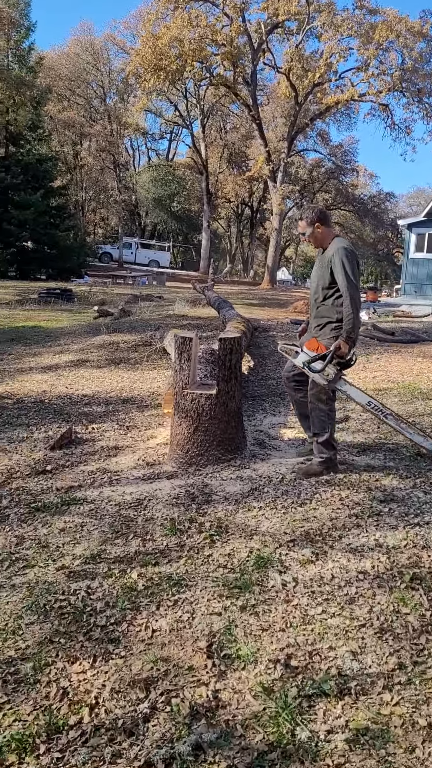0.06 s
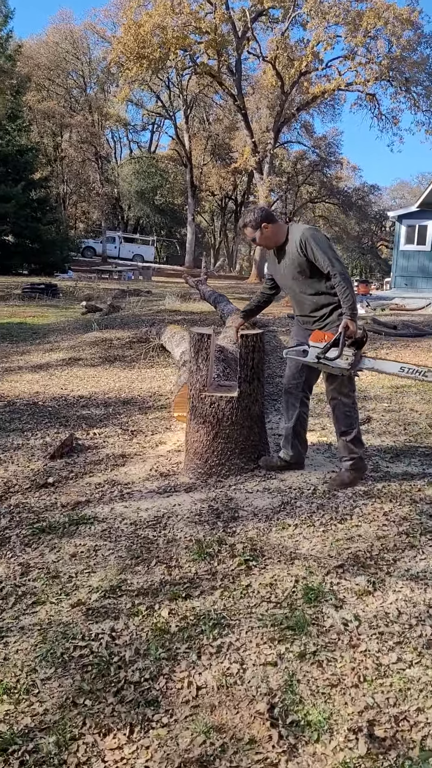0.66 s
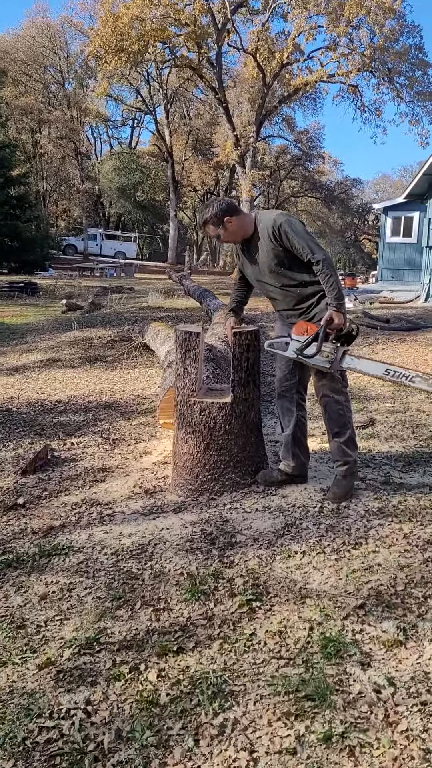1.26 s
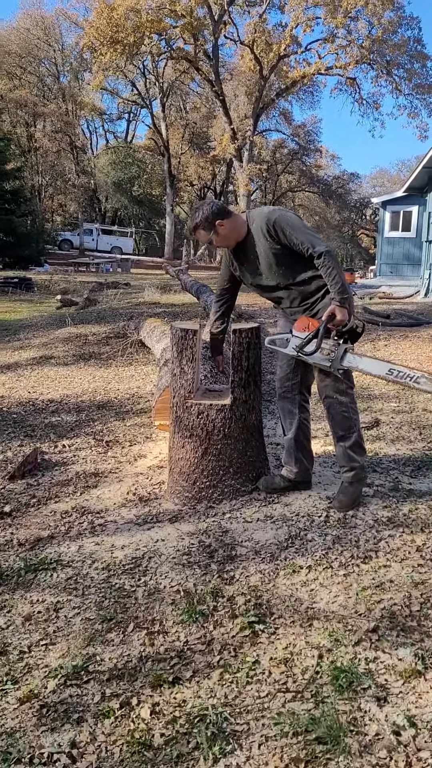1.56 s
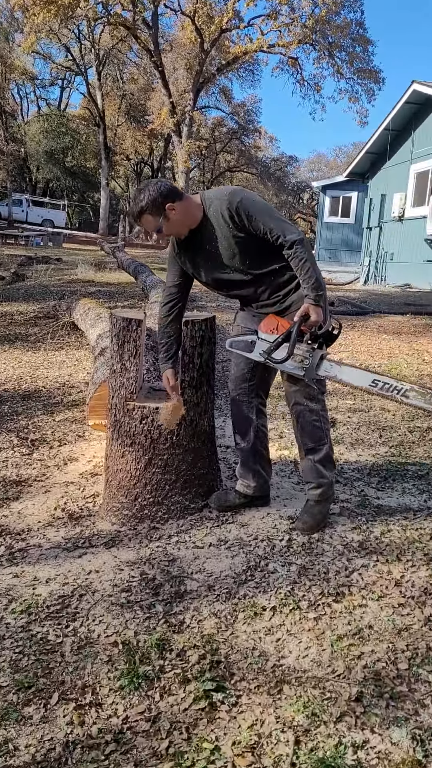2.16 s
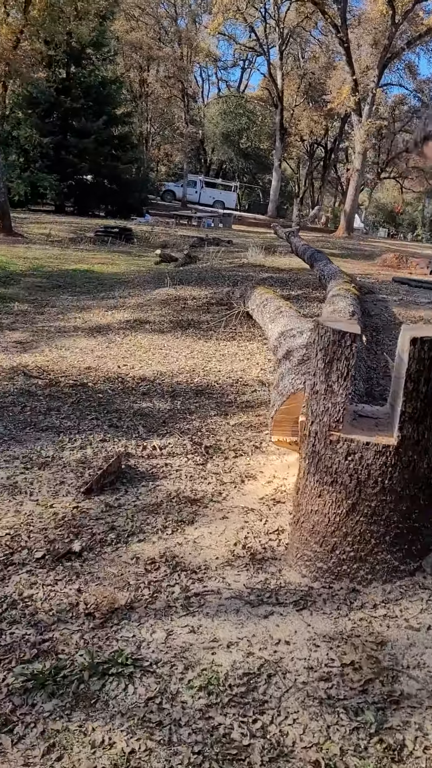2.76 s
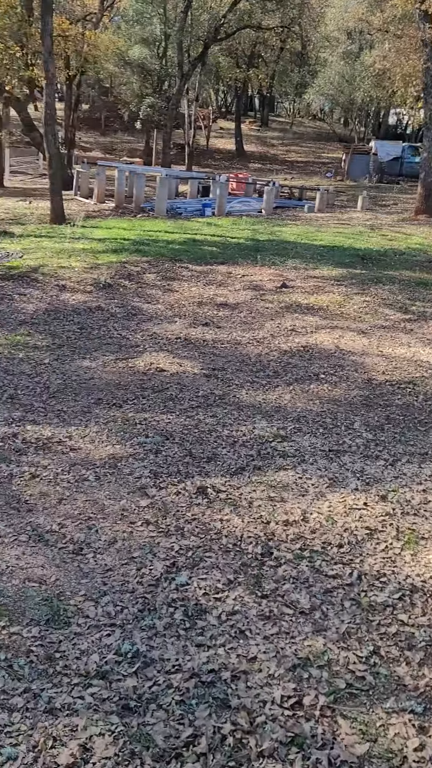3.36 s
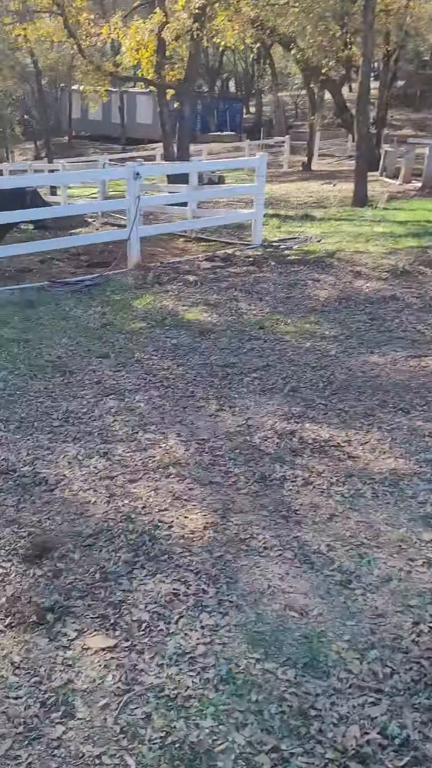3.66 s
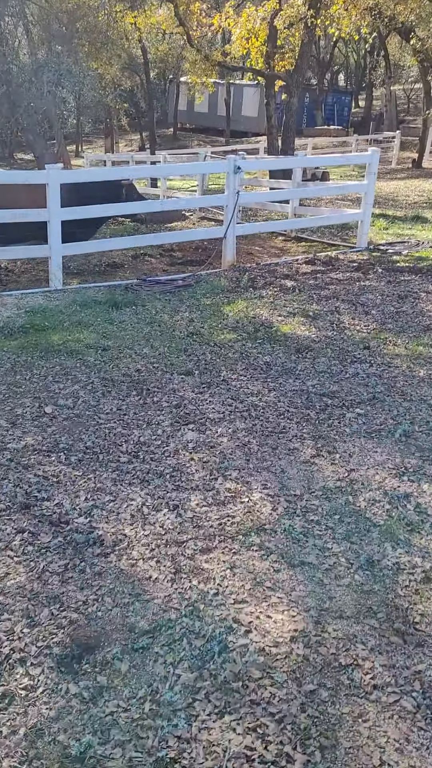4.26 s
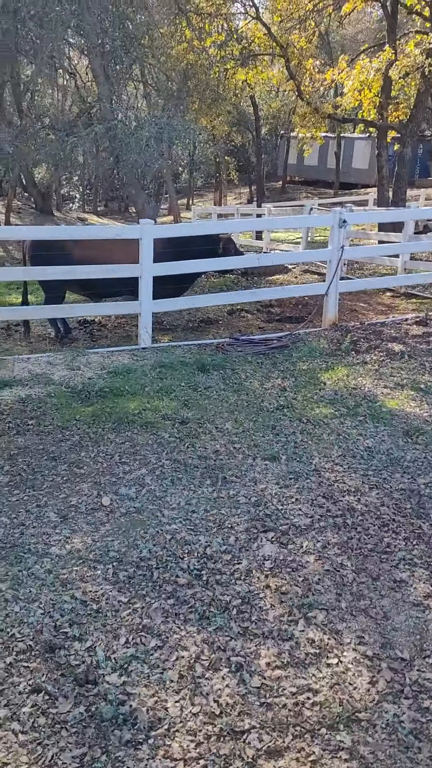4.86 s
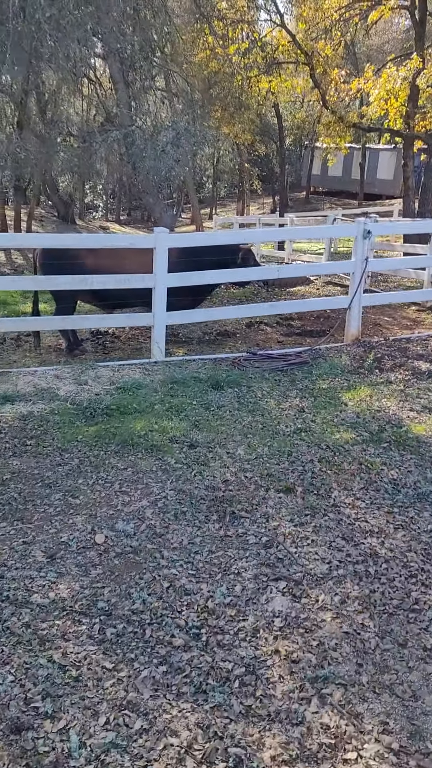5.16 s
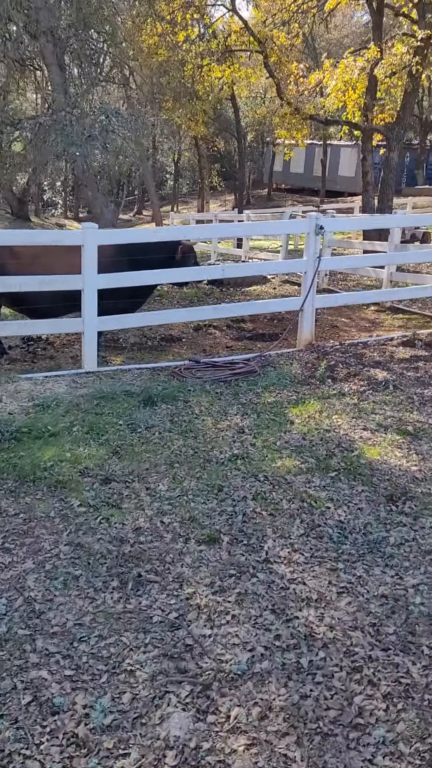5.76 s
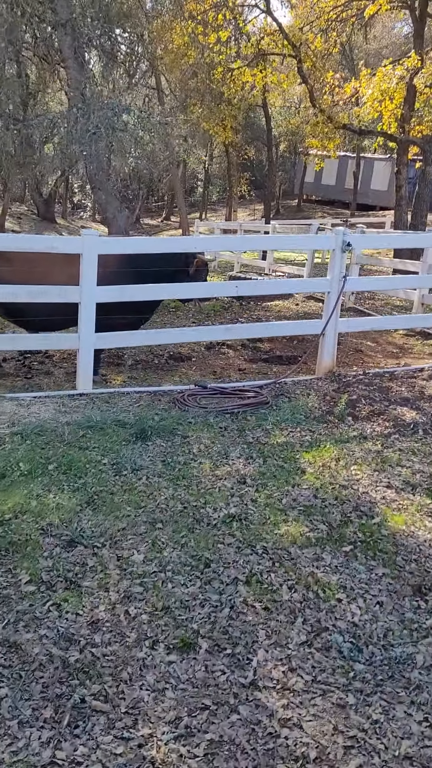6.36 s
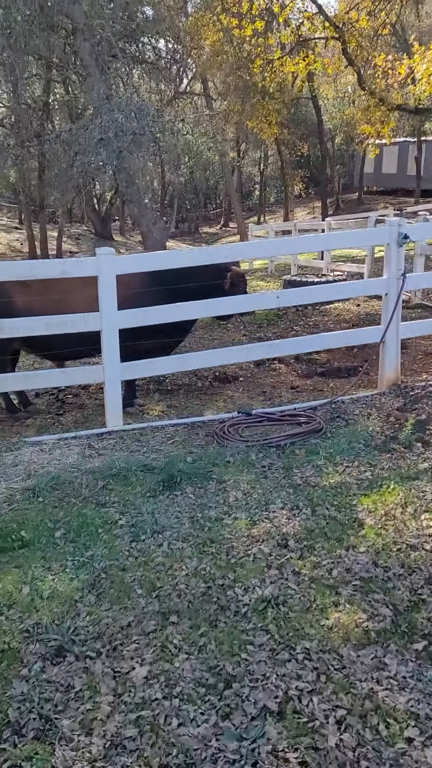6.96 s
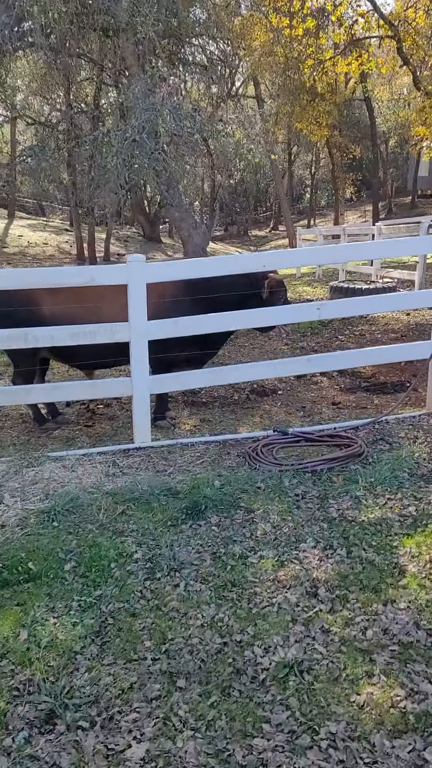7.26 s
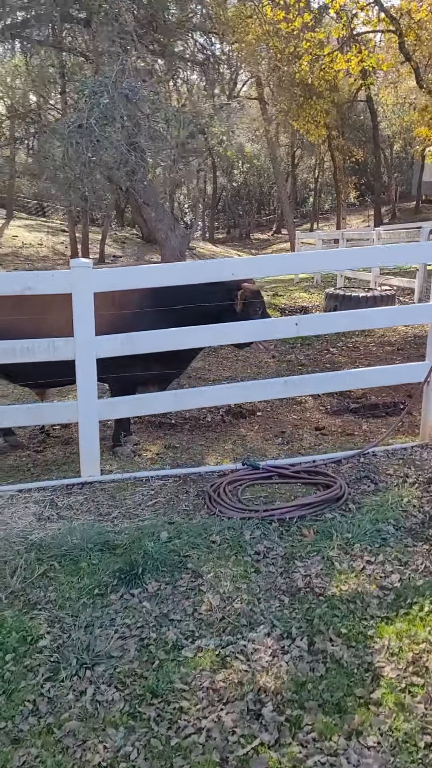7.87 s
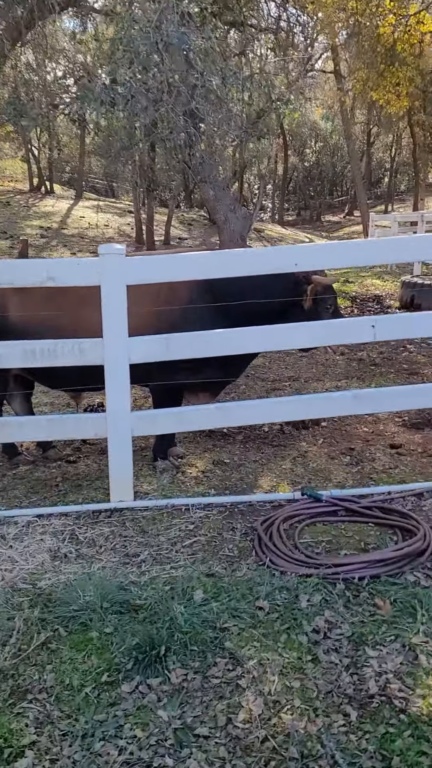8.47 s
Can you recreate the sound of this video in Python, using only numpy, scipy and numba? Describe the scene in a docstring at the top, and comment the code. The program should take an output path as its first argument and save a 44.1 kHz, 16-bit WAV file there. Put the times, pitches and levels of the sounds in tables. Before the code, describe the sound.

A bull bellows twice, each low hum breaking into a rasping roar, while footsteps crunch through dry leaves outdoors.

```python
"""A bull bellows three times behind a paddock fence while someone with a phone walks up through dry leaves.
The first bellow is just ending. The other two start as a rush of air and a low hum, then break into a
rasping roar as the mouth opens; the last dips in pitch midway. His vocal folds chop the air into pulses
that ring in his chest, throat, mouth and nose. Leaves crunch, twigs snap, heels knock, and a breeze
buffets the phone's two microphone ports (left and right) over the hush of far trees."""
import sys
import numpy as np
from scipy import signal
from scipy.fft import rfft, irfft
from scipy.io import wavfile
from scipy.ndimage import uniform_filter1d, map_coordinates
from numba import njit

SR = 44100
rng = np.random.default_rng(int(sys.argv[2]) if len(sys.argv) > 2 else 0)


def bounce(signal):
    """Save signal as a 16-bit WAV file at the path given by the first command-line argument."""
    frames = np.transpose(np.atleast_2d(signal))
    limited = np.clip(frames, -1, 1)
    pcm = np.round(limited * 32767).astype(np.int16)
    wavfile.write(sys.argv[1], SR, pcm)


N = 384993
TIME = np.arange(N) / SR


# How fast the vocal folds beat: t/s, f/Hz
VOICE_PITCH = [(0, 94.58), (.15, 87.47), (1.62, 76), (1.75, 79.11), (1.87, 91.47), (2.35, 102.3),
               (2.76, 103.6), (3.2, 110), (3.7, 114.5), (4.0, 111.5), (4.48, 110), (4.72, 125.5),
               (4.98, 131.5), (5.3, 108.7), (6.48, 76.27), (6.56, 88), (6.63, 95.44), (6.92, 100),
               (7.13, 105.8), (7.41, 106.9), (7.46, 98.15), (7.53, 103.2), (7.58, 85.7), (7.71, 104.2),
               (7.75, 119), (7.93, 129.5), (8.08, 129.5), (8.3, 124.9), (8.43, 125.5), (8.73, 117)]
# How far the mouth is open: t/s, opening/0-1
MOUTH_OPENING = [(0, 0.04), (.2, 0), (1.7, 0), (2.05, 0.26), (2.85, 0.01), (3.75, 0.26), (4.5, 0.34),
                 (4.98, 0.88), (5.22, 0.58), (5.35, 0), (6.5, 0.3), (7.0, 0.78), (7.65, 0.72), (7.9, 1),
                 (8.3, 1), (8.73, 0.89)]
def bull(mouth_shut_db=-47, mouth_opens_db=24.5, rasp_opens_db=19.5, waver_db=1.14):
    """The folds drive a deep hum, plus a mouth tone and a rasp that grow as the mouth opens."""
    (pitch_hz,), (opening,) = curves(VOICE_PITCH), curves(MOUTH_OPENING)
    voiced, blowing, rush, rough, rasp_db, nasal_db = effort()
    facing = np.interp(TIME, [2.6, 4.7], [.42, 1.0])  # the phone swings round to him
    pulses, alternation, rattle = larynx(pitch_hz, rough)
    mouth_tone = mouth(pulses, rattle, rough, opening, facing)
    rasp_tone = rasp(pulses, rattle, rough, opening, nasal_db, facing)
    hum_tone = hum(pulses, alternation, rattle, rough, pitch_hz, facing)
    hum_gain = voiced * hum_strength() * undb(waver_db * wander(16))
    mouth_gain = blowing * undb(mouth_shut_db + mouth_opens_db * opening) + (0.16 + 2.1 * opening) * rush
    rasp_gain = blowing * undb(rasp_db + rasp_opens_db * opening) + rush
    upper_voice = mouth_gain * mouth_tone + rasp_gain * rasp_tone
    return hum_gain * hum_tone + upper_voice * undb(waver_db * wander(11))


# One row a bellow: start/s, break into a roar/s, end/s, roughness of the hum/0-1, opening rush of air/dB,
# shut-mouth rasp in the hum/dB, shut-mouth rasp in the roar/dB, boost of the nose's ring in the hum/dB
BELLOW_PLAN = [(-.3, 0.19, .13, 0.37, -65, -47.5, -44, 0.5),
               (1.636, 2.822, 5.26, 0.19, -47.5, -49, -44.5, 2),
               (6.52, 7.73, 8.8, 0.31, -49, -50, -46.5, 6.5)]
def effort(attack_s=.052, release_s=0.024, roar_rough=0.551, break_s=.06, catch_rough=0.46, catch_s=.15):
    """Air rushes, the folds sputter and catch, the hum breaks into a roar, and the air runs out."""
    rows = np.array(BELLOW_PLAN)
    current = np.searchsorted((rows[:-1, 2] + rows[1:, 0]) / 2, TIME)  # the nearest bellow
    start, breaks, end, hum_rough, rush_db, hum_rasp_db, roar_rasp_db, nasal_db = rows[current].T
    voiced = envelope(start, attack_s, end, release_s)
    # air flows after the folds stop, and rushes before they catch
    blowing = envelope(start, attack_s, end + 0.057, release_s=0.048)
    rush = undb(rush_db) * envelope(start - 0.0635, 0.0089, start - .01, release_s)
    roaring = (1 + np.tanh((TIME - breaks) / break_s)) / 2
    rasp_db = hum_rasp_db + (roar_rasp_db - hum_rasp_db) * roaring
    sputter = (catch_rough - hum_rough) * swell(start, catch_s)
    rough = hum_rough + (roar_rough - hum_rough) * roaring + sputter + .4 * (1 - voiced)
    return voiced, blowing, rush, np.clip(rough, 0, 1), rasp_db, nasal_db * (1 - roaring)


def larynx(pitch_hz, rough, jitter=0.0098, flap_scatter=.16, puff_sharpness=0.29, slap_share=0.45):
    """The voice box: its folds pulse, strong and weak in turn; loose tissue rattles at half their rate."""
    unsteady_hz = pitch_hz * (1 + jitter * (0.25 + 2 * rough) * wander(45))
    phase = 2 * np.pi * np.cumsum(unsteady_hz) / SR
    cycle = phase // (2 * np.pi)
    beats = np.diff(cycle, prepend=0)  # one click a cycle
    unevenness = (-1) ** cycle * (.7 + .5 * wander(9)) + .5 * wander(110)
    pulses = unit(beats * (1 + rough ** 2 * unevenness))
    alternation = unit(beats * (-1) ** cycle)
    flap = 2 * np.pi * np.cumsum(pitch_hz / 2 * np.exp(flap_scatter * wander(130))) / SR
    slaps = unit(np.diff(flap // (2 * np.pi), prepend=0) * undb(2.7 * wander(90)))
    puffs = unit(rng.standard_normal(N) * np.exp(puff_sharpness * np.cos(flap) + 0.57 * np.cos(phase)))
    return pulses, alternation, unit(puffs + slap_share * slaps)


def hum(pulses, alternation, rattle, rough, pitch_hz, facing, rest_hz=314, follow=0.56, doubling_hz=115):
    """Throat and chest ring low; the deepest tones grow and stay clear in the roar."""
    # pushed to a high pitch, the folds' strong-weak beat adds a tone an octave down
    doubling = 0.37 * np.clip((pitch_hz - doubling_hz) / 12, 0, 1)
    deep_rattle = 0.77 * rough * rattle
    chest_flow = (0.68 + 0.4 * rough) * pulses + 1.45 * deep_rattle
    hum_flow = (1 - rough) * pulses + doubling * rough * alternation + (0.8 + 0.9 * rough) * deep_rattle
    clean = np.clip((.48 - rough) / .2, 0, 1)
    ring_hz = rest_hz + follow * clean * (3 * pitch_hz - rest_hz)  # leans towards three times the pitch
    throat = cavity(hum_flow, facing, ring_hz, width_hz=49, db=4, pan_db=-12, lead_ms=0.44)
    chest = cavity(chest_flow * (0.44 + rough), facing, 140, width_hz=98, db=-17.5, pan_db=-8, lead_ms=0)
    neck = cavity(chest_flow, facing, 235, width_hz=50, db=-4, pan_db=-6, lead_ms=0.2)
    return even(throat + chest - neck, .06)


# How loud the hum is: t/s, level/dB
HUM_LOUDNESS = [(.1, -29), (1.65, -30.5), (1.71, -27.5), (1.8, -28.5), (2.199, -21), (2.72, -22),
                (2.951, -26.5), (3.5, -26), (3.7, -22.5), (4.95, -22.5), (5.25, -22.5), (6.52, -25),
                (6.56, -21), (6.902, -18), (7.0, -14.5), (7.22, -13), (7.38, -11.5), (7.57, -17.5),
                (7.68, -14.5), (7.77, -20), (8.25, -18), (8.73, -22)]
# Brief dips in the hum: t/s, half length/s, dip/dB
HUM_STUMBLES = [(1.80, .02, -3.5), (6.769, .008, -4), (6.904, .01, -7), (6.942, .02, -4),
                (7.186, 0.0091, -11), (7.309, .014, -7.5), (7.437, .015, -3.5)]
def hum_strength(throb_hz=36, throb_depth=0.45):
    """The hum swells, stumbles for a few cycles at a time, and throbs as the last bellow gathers."""
    hum_db, = curves(HUM_LOUDNESS)
    stumble_db = sum(db * swell(s, half_s) for s, half_s, db in HUM_STUMBLES)
    throb = 1 + throb_depth * swell(6.73, half_s=.1) * np.sin(2 * np.pi * throb_hz * TIME)
    return throb * undb(hum_db + stumble_db)


# Where the mouth rings as jaw and neck stretch: t/s, f/Hz
MOUTH_RING = [(.1, 633), (1.6, 590), (3.2, 597), (4.5, 666), (5.0, 638), (6.5, 723), (7.25, 690.5),
              (7.9, 635), (8.7, 614)]
def mouth(pulses, rattle, rough, opening, facing):
    """The mouth rings, the back of the throat fades as it opens, and a rough roar spills between them."""
    ring_hz, = curves(MOUTH_RING)
    flow = (.85 - .3 * rough) * pulses + (.2 + 1.3 * rough) * rattle
    spill_flow = np.clip(rough - .4, 0, 1) * flow
    back_flow = np.clip(1 - opening, .15, 1) * flow
    front = cavity(flow, facing, ring_hz, width_hz=145, db=0, pan_db=12, lead_ms=0.35)
    spill = cavity(spill_flow, facing, 530, width_hz=240, db=4.2, pan_db=-10.5, lead_ms=0.22)
    back = cavity(back_flow, facing, 414, width_hz=117, db=-4.5, pan_db=-8.5, lead_ms=0.22)
    return even(front + spill - back, 0.083)


# Six high rings (resonances) of throat and nose, low to high:
# width/Hz, relative level/dB, change with the mouth wide open/dB, left minus right/dB, left lead/ms
RASP_RINGS = [(229, 6.5, 3.5, 3, 0.18), (215, 6, 4, -2, 0.27), (117, 5, -4.5, -3, 0.028),
              (130, -4, -3, -8.5, .12), (240, -7, -.5, -4, 0.2), (300, -14.5, -1.5, 2.5, .25)]
# Where those rings lie as neck and tongue move: t/s, then six times f/Hz
RASP_PATHS = [(0.101, 865, 1170, 1377, 1810, 2520, 3020), (1.65, 970, 1144, 1257, 1880, 2200, 2980),
              (2.1, 1045, 1300, 1525, 1920, 2180, 3190), (2.7, 950, 1150, 1384, 1760, 2130, 3180),
              (3.4, 877, 1084, 1427, 1780, 2220, 3500), (4.1, 910, 1164, 1438, 1880, 2140, 3680),
              (5.0, 946, 1200, 1420, 1890, 2400, 3453), (6.6, 950, 1255, 1390, 1915, 2660, 3980),
              (7.3, 965, 1263, 1379, 1823, 2510, 3850), (8.0, 925, 1236, 1490, 1957, 2620, 3540),
              (8.6, 890, 1213, 1397, 1830, 2350, 3460)]
def rasp(pulses, rattle, rough, opening, nasal_db, facing, flicker_db=1.22, drift=.009, hiss_db=-21):
    """Throat and nose ring high, each ring flickering and drifting, with a hiss of breath on top."""
    nose_ring, first_airy_ring = 3, 3  # counted from 0
    voiced_flow = (.9 - .7 * rough) * pulses + (.6 + rough) * rattle
    airy_flow = .4 * pulses + 1.1 * rattle
    rings = 0
    for k, (hz, (width_hz, db, opens_db, *place)) in enumerate(zip(curves(RASP_PATHS), RASP_RINGS)):
        db = db + opens_db * opening + nasal_db * (k == nose_ring) + flicker_db * wander(8)
        flow = voiced_flow if k < first_airy_ring else airy_flow
        rings = rings + cavity(flow, facing, hz * (1 + drift * wander(10)), width_hz, db, *place)
    bright_noise = colour(rng.standard_normal((2, N)), LEAF_COLOUR)
    hiss = unit(cut(bright_noise, 3600, "high")) * undb([[-5], [0]])
    return even(rings, 0.23) + undb(hiss_db) * hiss


def cavity(flow, facing, hz, width_hz, db, pan_db, lead_ms):
    """One air space in the bull rings; facing scales how unequally it reaches the two ports."""
    return ports(undb(db) * steep_ring(flow, hz, width_hz), pan_db * facing, lead_ms)


# Wheezes as a bellow starts or ends: t/s, half length/s, level/dB, f/Hz, width/Hz
THROAT_WHEEZES = [(.13, .05, -60, 3080, 450), (.2, 0.032, -43.5, 1350, 150), (0.205, 0.032, -59, 2600, 500),
                  (1.583, .011, -42, 990, 190), (1.625, 0.018, -43, 980, 190),
                  (1.613, 0.028, -44, 1230, 300), (1.645, 0.046, -53.5, 2930, 620),
                  (6.487, 0.023, -42, 760, 220), (6.522, .05, -57, 4100, 600)]
def wheezes():
    """Air whistles through the narrowed throat."""
    air = rng.standard_normal(N)
    whistle = sum(undb(db) * swell(s, half_s) * unit(steep_ring(air, hz, width_hz))
                  for s, half_s, db, hz, width_hz in THROAT_WHEEZES)
    return ports(whistle, pan_db=-1, lead_ms=0.1)


def echoes(voice, far_s=0.8, far_db=-20, near_s=0.16, near_db=-6):
    """Ground and fence rails scatter the upper voice at once; trunks and sheds add a thin, dull echo."""
    t = TIME[:SR]
    near = cut(rng.standard_normal((2, SR)), 658, "high", order=4) * undb(-60 * t / near_s)
    far = cut(rng.standard_normal((2, SR)), 2500, "low") * undb(-60 * t / far_s)
    # scaled so that a longer echo is no louder
    tail = near * undb(near_db) / np.sqrt(near_s) + far * undb(far_db) / np.sqrt(far_s)
    return signal.fftconvolve(voice, tail * np.sqrt(2 * np.log(1000) / SR), axes=1)[:, :N]


# Steps in dry leaves: t/s, crunch level/dB, coming down/s, pressing/s, scuff above the crunch/dB
FOOTFALLS = [(0.311, -52, 0.029, 0.082, 1.5), (.48, -55.5, 0.013, 0.017, 2), (.65, -68.5, 0.014, 0.033, 6),
             (0.784, -53.5, 0.037, 0.016, 3.5), (.88, -53.5, 0.021, 0.016, 0.5),
             (1.03, -54.5, 0.055, 0.029, 0.5), (1.331, -65, 0.0065, 0.058, 3),
             (1.59, -59.5, 0.074, 0.16, 5), (2.246, -43.5, 0.045, 0.029, -2),
             (2.528, -51.5, 0.016, 0.12, -9.5), (2.848, -48.5, 0.026, 0.15, -8.5),
             (3.129, -54.5, 0.033, 0.014, 6.5), (3.42, -54.5, 0.027, 0.17, -5),
             (4.108, -43.5, 0.073, 0.049, -10), (4.61, -49.5, 0.019, 0.13, -3),
             (5.144, -41, 0.014, 0.13, -4.5), (5.32, -48, 0.012, 0.039, -9.5),
             (5.491, -48.5, 0.015, 0.016, -7.5), (5.661, -40.5, 0.015, 0.02, -12),
             (5.78, -61, 0.03, 0.013, 6.5), (5.91, -58.5, 0.029, 0.028, -2),
             (6.336, -56, 0.01, 0.087, -0.5), (6.85, -53, 0.047, 0.046, -4),
             (7.29, -47.5, 0.011, 0.016, -1), (7.415, -38.5, 0.087, 0.049, -6.5),
             (7.981, -36, 0.034, 0.011, -10), (8.36, -37, 0.078, 0.1, -7), (8.548, -44.5, 0.043, 0.2, 0.5)]
def footsteps(apart=0.87, crackle_db=2.0, rustle_db=-71, release_s=0.035, settle_db=-11.5, settle_s=0.19):
    """The sole scuffs the soil; dry leaves break in tiny cracks, then settle."""
    crunch_power = (undb(rustle_db) * envelope(1.9, 0.21, 5.9, 0.12)) ** 2  # leaves stir between steps
    scuff_power = 0
    for s, db, down_s, press_s, scuff_db in FOOTFALLS:
        lifts = s + down_s + press_s
        load = envelope(s, down_s, lifts, release_s)
        load += undb(settle_db) * envelope(s, down_s, lifts, settle_s)
        crunch_power += (undb(db) * load) ** 2
        scuff_power += (undb(db + scuff_db) * load) ** 2
    # part of the sound scatters differently to each port
    shared, left, right = (unit(clicks(1500, spread_db=4.5)) + .5 * rng.standard_normal(N)
                           for _ in range(3))
    cracks = ports(shared, pan_db=0, lead_ms=-0.5236) + apart * np.array([left, right])
    crunch = even(leafy(cracks), 0.13) * np.sqrt(crunch_power)
    scuff = even(earthy(cracks) * undb([[-3], [0]]), 0.19) * np.sqrt(scuff_power)
    return (crunch + scuff) * undb(crackle_db * wander(60))


# The bright tone of dry leaves, also used for the bull's hiss: f/Hz, level/dB
LEAF_COLOUR = [(300, -16.5), (1000, -17.5), (2000, -2), (3000, -20.5), (4000, -4.5), (5000, -9), (6200, 2),
               (7300, -8), (8700, 2), (10500, -3.5), (13000, 2), (16000, 0)]
def leafy(cracks):
    """Make cracks sound like dry leaves; the right port, facing the feet, gets most of the treble."""
    crunch = colour(cracks, LEAF_COLOUR)
    dull = cut(crunch, 3700, "low", order=1)
    return dull * undb([[-5], [0]]) + (crunch - dull) * undb([[-12], [-1]])


# The dull tone of a sole on bare soil: f/Hz, level/dB
SOIL_COLOUR = [(100, -5), (300, -2.5), (520, -6.5), (750, -2.5), (1300, -1), (2000, -8.5), (3500, -11.5),
               (6000, -18), (16000, -46.5)]
def earthy(cracks):
    """Soil muffles cracks into scuffs and knocks."""
    return colour(cracks, SOIL_COLOUR)


# Twigs and stiff leaves that snap: t/s, relative level/dB, knock above the snap/dB
TWIG_SNAPS = [(0.504, -31, 9), (0.522, -33, 8), (1.014, -41, 10), (1.332, -45, 11), (1.3995, -28.5, 6.5),
              (1.922, -33, -1), (3.612, -29.5, -18), (4.335, -32, -1), (4.775, -23.5, -8),
              (5.3616, -21, -16), (5.3885, -25, 4), (5.3963, -13, 0.5), (5.43, -32.5, 9), (5.46, -32, -10),
              (5.5107, -15, -10), (5.835, -28, 9), (6.088, -40, -8), (6.4035, -23.5, -0.5),
              (6.932, -23.5, 6.5), (7.209, -29, -2), (7.236, -26, -4), (7.533, -11.5, -10),
              (7.878, -23.5, 14)]
def twigs(ring_s=0.0031, tail_s=0.0087, tail_db=-19, gain_db=4):
    """Each snap is a sharp crack with a short rustle after it, over a dull knock of the sole."""
    t = TIME[:2048]
    cracks, knocks = np.zeros((2, N + len(t)))
    fade = np.exp(-t / ring_s) + undb(tail_db) * np.exp(-t / tail_s)
    for s, db, knock_db in TWIG_SNAPS:
        crack = rng.standard_normal(len(t)) * fade
        crack *= undb(db) / np.abs(crack).max()
        span = slice(int(s * SR), int(s * SR) + len(t))
        cracks[span] += crack
        knocks[span] += undb(knock_db) * crack
    snaps = leafy(ports(cracks[:N], pan_db=0, lead_ms=-0.572))
    thuds = ports(earthy(knocks[:N]), pan_db=-2.5, lead_ms=-0.5)
    return (snaps + thuds) * undb(gain_db)


# Curled leaves crushed under the sole: t/s, level/dB, length/s
CRUSHED_LEAVES = [(0.667, -52.5, 0.018), (0.707, -51.5, .014), (0.796, -52, .012), (0.816, -44, 0.028),
                  (.905, -55, .025), (5.677, -44.5, 0.032), (5.763, -52, 0.023)]
# How a curled leaf rings: f/Hz, width/Hz, relative level/dB
LEAF_RINGS = [(1210, 640, 0), (1980, 340, 1), (3770, 600, -7)]
def crumples(per_s=900):
    """A curled leaf gives way in a quick run of cracks that ring its stiff shell."""
    cracks = clicks(per_s, spread_db=0.5)
    shell = sum(undb(db) * ring(cracks, hz, width_hz) for hz, width_hz, db in LEAF_RINGS)
    load = sum(undb(db) * envelope(s, .003, s + length_s, 0.0075) for s, db, length_s in CRUSHED_LEAVES)
    return even(ports(shell, pan_db=-2.8, lead_ms=-0.553), 0.039) * load


# Heel strikes: t/s, level/dB, f/Hz, fade time/s
HEEL_KNOCKS = [(.36, -41, 450, .014), (.405, -35, 560, 0.011), (.449, -38.5, 480, 0.016),
               (.504, -29, 600, 0.0041), (0.521, -25, 560, 0.0037), (5.808, -41.5, 307, .035),
               (6.362, -44.5, 290, 0.027)]
def heels(width_share=0.99):
    """Each heel gives a short, hollow knock on firm ground."""
    knocks, t = np.zeros(N), TIME[:8192]
    for s, db, hz, fade_s in HEEL_KNOCKS:
        hollow = unit(steep_ring(rng.standard_normal(len(t)), hz, width_share * hz))
        knocks[int(s * SR):int(s * SR) + len(t)] += undb(db) * hollow * np.exp(-t / fade_s)
    return ports(knocks, pan_db=-5.5, lead_ms=-0.6)


# Strength of the steady breeze: t/s, relative level/dB
BREEZE_STRENGTH = [(0, -37), (1.6, -44), (2.1, -50), (3.1, -38), (6.2, -41), (7.0, -35.5), (8.73, -39)]
# Single gusts: t/s, relative level/dB, half length/s
BREEZE_GUSTS = [(1.102, -33.5, 0.036), (1.563, -36, 0.11), (4.806, -31, 0.071), (5.24, -28, 0.056),
                (8.01, -31, 0.093), (8.51, -34, 0.07)]
# The deep rumble of wind on a microphone: f/Hz, level/dB
WIND_COLOUR = [(8.8, -37), (15, 0.5), (38, -3.5), (59, 3), (83, 1.5), (119, -17.5), (139, -26), (250, -33),
               (320, -65.5), (550, -120)]
def breeze(shared=0.21, flutter_db=4, gain_db=-3):
    """Swirls of air thump on each port, mostly the right one; gusts swell out of the steady breeze."""
    breeze_db, = curves(BREEZE_STRENGTH)
    strength = undb(breeze_db) + sum(undb(db) * swell(s, half_s) for s, db, half_s in BREEZE_GUSTS)
    flutter = undb(flutter_db * wander(12))
    swirls = colour(rng.standard_normal((2, N)) + shared * rng.standard_normal(N), WIND_COLOUR) * flutter
    return even(swirls * undb([[-7], [0]]), 0.33) * strength * undb(gain_db)


# The soft tone of far trees: f/Hz, level/dB
HUSH_COLOUR = [(88, -16), (150, -12.5), (190, -6.5), (414, -2.5), (1040, -16), (1210, -11.5), (7620, -20.5),
               (13700, -30.5), (16000, -25)]
def countryside(level_db=-62):
    """A faint, nearly steady hush of far trees."""
    return unit(colour(rng.standard_normal((2, N)), HUSH_COLOUR)) * undb(level_db + wander(3.2))


def undb(db):
    """Turn decibels into a factor to multiply by."""
    return 10 ** (np.asarray(db) / 20)


def curves(table):
    """The columns of a table, joined by straight lines in time."""
    s, *columns = np.transpose(table)
    return [np.interp(TIME, s, column) for column in columns]


def envelope(start, attack_s, end, release_s):
    """Rise from the start, hold until the end, then die away."""
    return np.clip((TIME - start) / attack_s, 0, 1) * np.exp(-np.maximum(TIME - end, 0) / release_s)


def swell(s, half_s):
    """A smooth rise and fall around a moment."""
    return np.exp(-((TIME - s) / half_s) ** 2)


def wander(per_s):
    """A smooth random curve of typical size 1 that changes per_s times a second."""
    coarse = TIME[::24]
    path = map_coordinates(rng.standard_normal(8192), [coarse * per_s], order=2, mode="wrap")
    return np.interp(TIME, coarse, unit(path))


def clicks(per_s, spread_db):
    """Randomly timed clicks of unequal size and either sign."""
    hits = (rng.random(N) < per_s / SR) * rng.standard_normal(N)
    return hits * undb(spread_db * np.minimum(rng.exponential(size=N), 4))


def unit(x):
    """Scale a sound to an average power of 1."""
    return x / np.sqrt(np.mean(x ** 2) + 1e-18)


def even(x, span_s):
    """Hold the power of a stereo sound near 1 over the given span."""
    power = uniform_filter1d(np.mean(x, axis=0) ** 2, max(int(span_s * SR), 8))
    return x / np.sqrt(np.abs(power) + 1e-12)


def colour(x, points):
    """Shape the tone of a sound by rows of f/Hz, level/dB."""
    hz, db = np.transpose(points)
    f = np.maximum(np.fft.rfftfreq(N, 1 / SR), 1)
    return irfft(rfft(x) * undb(np.interp(np.log(f), np.log(hz), db)), N)


def cut(x, hz, keep, order=2):
    """Keep the "low" or the "high" side of a frequency."""
    return signal.sosfilt(signal.butter(order, hz, keep, fs=SR, output="sos"), x)


@njit
def band_pass(x, hz, width_hz):
    """A state-variable filter: it keeps a band of frequencies whose centre may move."""
    out, band_state, low_state = np.empty(len(x)), 0., 0.
    for i in range(len(x)):
        step, damping = np.pi * hz[i] / SR, width_hz / hz[i]
        band = (band_state + step * (x[i] - low_state)) / (1 + step * (step + damping))
        band_state = 2 * band - band_state
        low_state += 2 * step * band
        out[i] = damping * band
    return out


def ring(x, hz, width_hz):
    """Let a sound ring around one steady or moving frequency."""
    return band_pass(x, hz * np.ones(len(x)), float(width_hz))


def steep_ring(x, hz, width_hz):
    """Ring twice over, so that less leaks through on either side."""
    return ring(ring(x, hz, width_hz), hz, width_hz)


def ports(x, pan_db, lead_ms):
    """A sound at the two microphone ports: louder and earlier on the left for positive values."""
    delay = np.exp(-2j * np.pi * np.fft.rfftfreq(N, 1 / SR) * lead_ms / 1000)
    return np.array([x * undb(pan_db / 2), irfft(rfft(x) * delay, N) * undb(-pan_db / 2)])


def scene():
    """The bull and his echo, the walker's feet, and the air around them."""
    voice = bull() + wheezes()
    return voice + echoes(voice) + footsteps() + twigs() + crumples() + heels() + breeze() + countryside()


def record(dry, fade_in_s=.005, top_hz=15900):
    """The sound starts with a very short fade-in, and the highest treble is cut."""
    treble_cut = signal.ellip(10, .2, 80, top_hz, fs=SR, output="sos")
    return signal.sosfilt(treble_cut, dry * np.minimum(TIME / fade_in_s, 1))


dry = scene()
out = record(dry)
bounce(out)
```